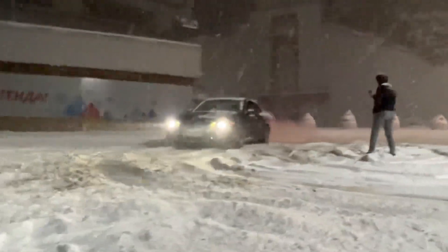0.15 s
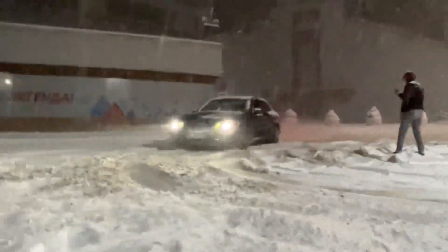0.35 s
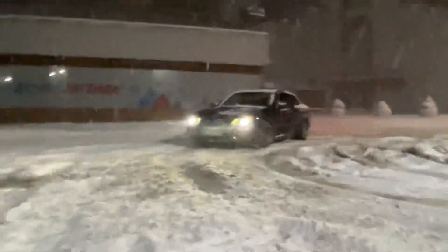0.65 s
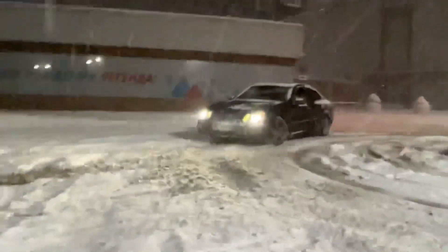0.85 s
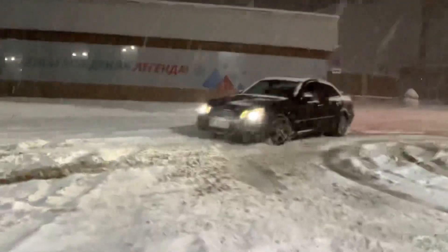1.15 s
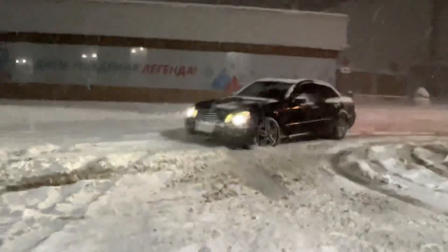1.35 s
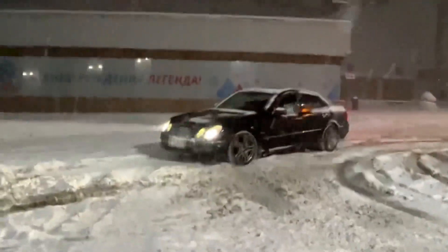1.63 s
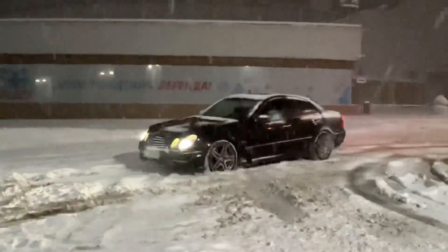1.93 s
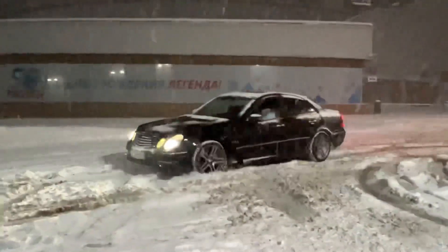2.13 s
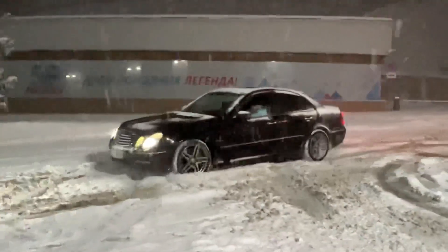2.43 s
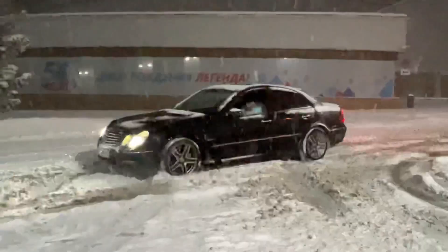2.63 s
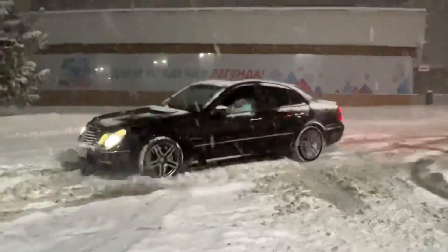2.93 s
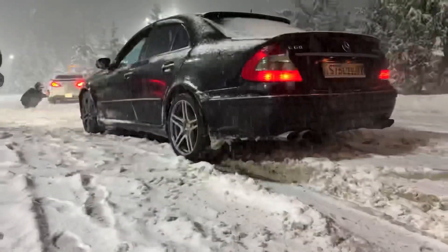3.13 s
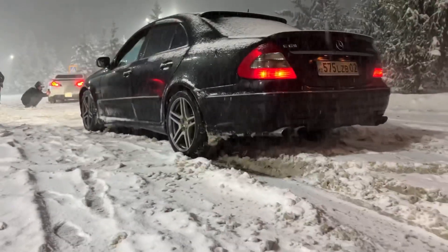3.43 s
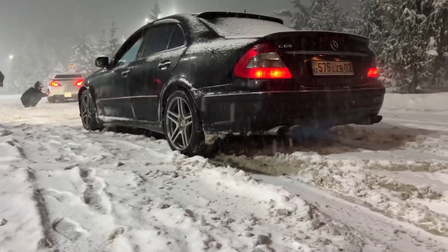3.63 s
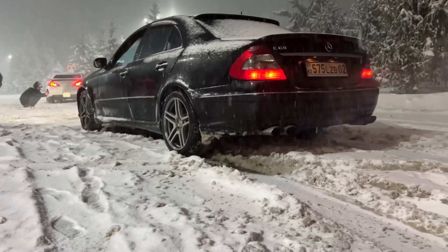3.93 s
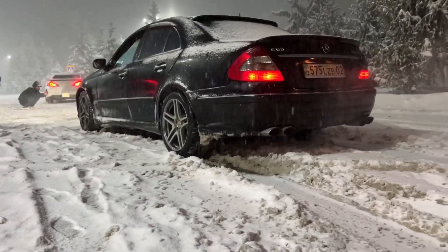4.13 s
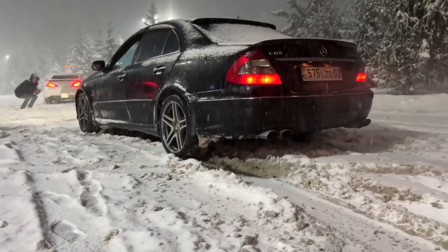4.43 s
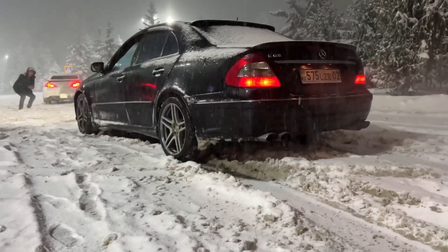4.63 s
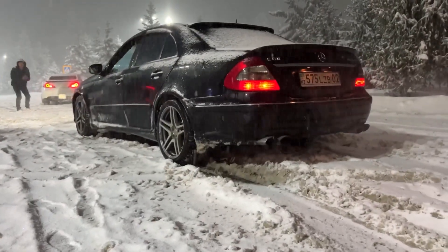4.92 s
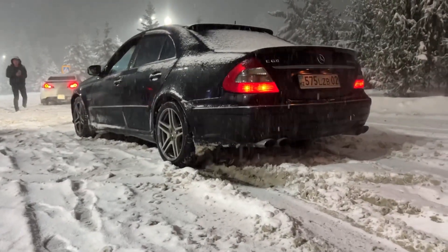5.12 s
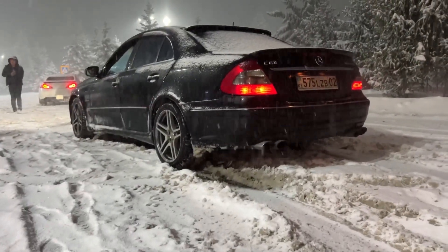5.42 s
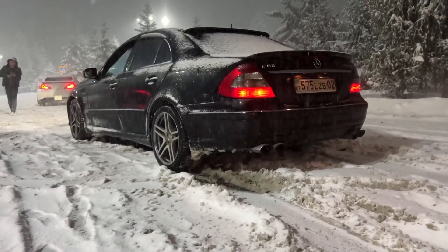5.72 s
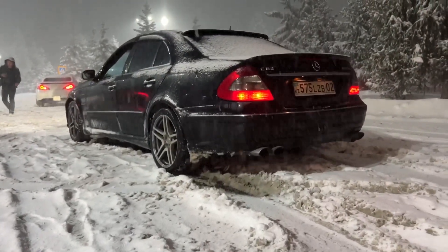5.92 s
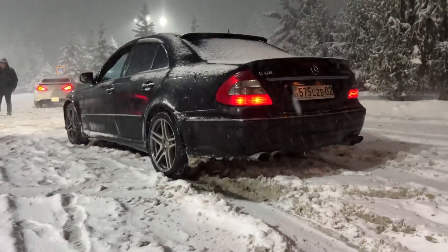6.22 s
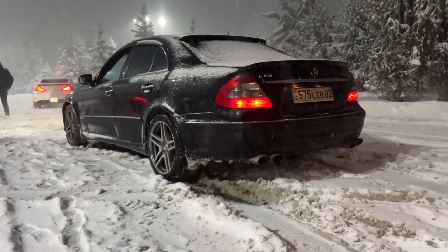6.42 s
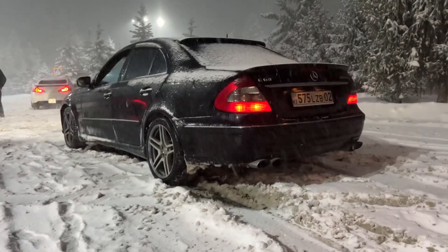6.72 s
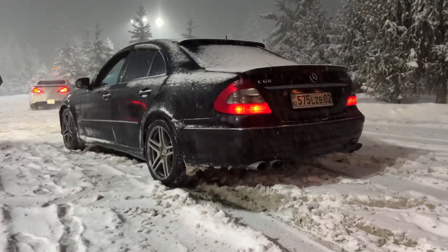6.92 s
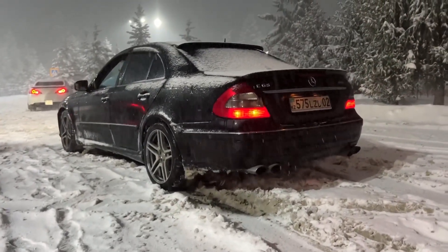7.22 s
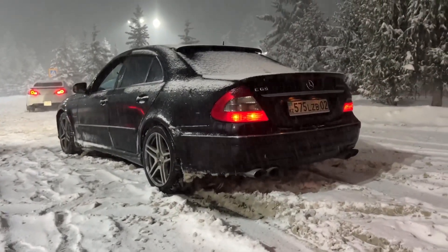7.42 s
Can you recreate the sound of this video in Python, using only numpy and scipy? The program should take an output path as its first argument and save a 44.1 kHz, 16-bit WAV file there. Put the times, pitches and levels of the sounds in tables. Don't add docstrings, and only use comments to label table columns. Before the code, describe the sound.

A black sedan with a V8 idles low and uneven across a snowy car park, brakes squeaking briefly, slush hissing, ticking and chirping under its tyres. At three seconds the view jumps close behind the tailpipes. Three loud revs follow, booming and rasping, with hard cracks and loose pops as the engine runs down. Outdoor stereo microphone, peaks slightly saturated.

```python
import sys
import numpy as np
from scipy import signal
from scipy.fft import rfft, irfft, next_fast_len
from scipy.io import wavfile
from scipy.ndimage import uniform_filter1d

SR = 44100
rng = np.random.default_rng(int(sys.argv[2]) if len(sys.argv) > 2 else 0)


def pcm_store(signal):
    levels = np.round(np.clip(np.atleast_2d(signal), -1, 1) * 32767)
    wavfile.write(sys.argv[1], SR, levels.astype(np.int16).T)


def nominal_scale(level):
    x = np.asarray(level, float) / 20
    return 10 ** x


N = 333396

CLOSE_S, REV_S = 3.0, 3.3
FIRST_FIRING = .183
# time in seconds, engine cycles per second.
IDLE_SPEED = [
    (0, 5.955),
    (2.95, 5.955),
    (3.0, 6.6),
]
CYLINDER_DB = [3.3, -3.0, 4.9, -2.9, 4.5, -3.2, 2.8, -6.5]
# start in seconds, peak in dB, brightness in dB, ring in Hz.
FIRST_POPS = [(3.3403, -16.5, -30, 1430), (3.3694, -17.5, -23, 1610), (3.3833, -25, -5, 1550),
              (3.4098, -15, -23, 1320), (3.4451, -12.5, -16, 1500), (3.4643, -11.5, -29, 1500),
              (3.4725, -21.5, -13, 1760), (3.4923, -9, -20, 1230), (3.5187, -14.5, -17, 1480),
              (3.5326, -9, -29, 1530), (3.5567, -12, -27, 1450), (3.5765, -24, -20, 1370),
              (3.595, -8, -18, 1560), (3.6048, -16, -22, 1280), (3.6277, -10, -13, 1580),
              (3.6531, -27, -11, 1150), (3.6736, -15.5, -11, 1400), (3.6986, -19, -11, 1360),
              (3.7153, -11, -22, 1500), (3.7368, -11.5, -22, 1050), (3.7674, -16, -25, 1570),
              (4.0116, -6.5, -35, 1530), (4.0775, -5.5, -9.5, 1280), (4.0972, -11.5, -32, 1120),
              (4.1119, -29, -27, 1210), (4.1353, -19.5, -31, 1050), (4.1502, -16, -34, 1240),
              (4.1743, -15.5, -35, 1180), (4.1917, -2, -17, 1360), (4.1973, -1.5, -11.5, 1430),
              (4.2096, -8, -7.5, 1400), (4.2238, -8.5, -2, 1920), (4.2392, -8, -19, 1500),
              (4.2731, -5.5, -15.5, 1200), (4.3118, -19, -30, 910), (4.3578, -3.5, -11, 1210),
              (4.3643, -11, -20, 1380), (4.3775, -17, -7, 1530), (4.3921, -4, -8, 1700),
              (4.436, -5, -23, 1290), (4.4457, -9.5, -23, 1040), (4.4991, -17, -32, 1060),
              (4.5315, -16.5, -21, 1070), (4.5491, -1, -21, 1340), (4.5775, -3, -9.5, 1220),
              (4.6012, -3.5, -26, 1560), (4.7159, -14, -45, 1460)]
SECOND_POPS = [(4.9898, -16.5, -14, 1860), (5.4415, -7.5, -22, 1400), (5.4505, -11.5, -2, 1320),
               (5.5926, -16, -6, 1250), (5.6001, -4.5, -7, 1450), (5.6279, -11.5, -7, 1250),
               (5.6548, -4.5, -9, 1620), (5.684, -7, -12.5, 1220), (5.6996, -6.5, -12, 1500),
               (5.7524, -16, -16, 1200), (5.8205, -18, -33, 1360), (5.8562, -3.5, -9.5, 1310),
               (5.8765, -9.5, -24, 1100), (5.8927, -4, -16.5, 1450), (5.9175, -16, -27, 1510),
               (5.9277, -6, -24, 1110), (5.9485, -13, -38, 1210), (5.9783, -4.5, -16, 1420),
               (5.9937, -25, -35, 1380), (6.0169, -17, -33, 1440), (6.0387, -14.5, -37, 1020),
               (6.0546, -13.5, -36, 1420), (6.0638, -11, -36, 1310), (6.0894, -4, -12.5, 1280),
               (6.0993, -7.5, -21, 1090), (6.1067, -7, -13, 1360), (6.1409, -14, -33, 1450),
               (6.1556, -19, -36, 1290), (6.172, -7, -18, 1380), (6.1874, -37, -29, 1390),
               (6.1948, -8, -18.5, 1140), (6.2182, -15.5, -34, 1150), (6.2376, -7.5, -36, 1390),
               (6.2534, -11.5, -38, 1300), (6.2688, -6.5, -12, 1350), (6.2798, -3, -12.5, 1290),
               (6.3295, -20.5, -38, 1110), (6.3671, -23, -28, 1330), (6.3911, -16.5, -37, 990),
               (6.4086, -13.5, -18.5, 1220), (6.5281, -22.5, -39, 1240), (6.6838, -27.5, -26, 1350),
               (7.3365, -13, -18.5, 1180), (7.3476, -16, -26, 1090), (7.3582, -26, -30, 1270),
               (7.4627, -7, -3, 1350), (7.5139, -3, -7.5, 1360)]


def revving():
    # time in seconds, cycles per second.
    speed = [(3.3, 6.64), (3.39, 8.85), (3.7, 24.3), (3.81, 26.7), (3.95, 28.4), (4.18, 25.7), (4.31, 22.9),
             (4.65, 19.4), (4.89, 17.9), (5.25, 32.6), (5.38, 34.8), (6.0, 27.6), (6.35, 22), (6.88, 19.3),
             (7.11, 31.2), (7.19, 33.8), (7.27, 35.2), (7.56, 30.7)]
    # time in seconds, force of the exhaust pulses in dB, gas flow out of the tips in dB.
    effort = [(3.34, -31.5, -30), (3.6, -17.5, -19), (3.84, -25.5, -30.5), (4.18, -24, -29.5),
              (4.62, -27, -36), (4.93, -29, -44), (5.0, -20.5, -22.5), (5.23, -20, -16.5),
              (5.38, -27, -29.5), (5.48, -26.5, -20.5), (5.68, -30.5, -26.5), (5.8, -29.5, -34.5),
              (6.3, -30.5, -38), (6.87, -42, -48.5), (6.95, -25.5, -23.5), (7.14, -24, -19.5),
              (7.25, -32.5, -31.5), (7.45, -30.5, -24.5)]
    load_db = [7, -3, -1, 2, -2, -4, 0, -4]
    # centre in Hz, width in Hz, level in dB.
    boom_modes = [(46.9, 6, 6), (90, 16.2, 0.5), (134, 35.7, 2)]
    bark_modes = [(267, 26, -6.5), (371, 28.7, 2.5), (431.4, 36, 0), (520, 195, -14.5), (210, 120, -16)]
    # frequency in Hz, density in dB per Hz.
    rasp_spectrum = [(350, -33.5), (620, -9), (810, 3.5), (950, -0.5), (1120, 4), (1280, -5), (1420, 1),
                     (1850, -6), (2300, -17.5), (3200, -17.5), (4200, -27.5), (6000, -58)]
    sizzle_spectrum = [(2350, -42), (4000, -5), (5160, 0.5), (6310, 0), (7630, -1.5), (8800, -0.5),
                       (10100, -1), (11200, -2.5), (12300, -14), (13600, -28), (14600, -24), (15600, -16),
                       (16500, -23)]
    # centre in Hz, width in Hz, level in dB.
    jet_modes = [(1740, 100, 6.5), (3640, 270, -5), (4670, 350, -20.5)]
    late_jet_modes = [(1400, 240, 5.5), (3080, 300, -0.5), (4380, 380, -6)]

    t = np.arange(N) / SR
    speed_lag_s, late_jet_s = .06, 6.8
    steady_per_s = 42
    per_s = uniform_filter1d(in_time(speed)[0], round(speed_lag_s * SR))
    force_db, flow_db = in_time(effort)
    on = np.clip((t - 3.325) / 0.033, 0, 1)
    cycles = np.cumsum(per_s) / SR
    uneven = roughness()
    gain_of_speed = uniform_filter1d(np.gradient(np.log(per_s)) * SR, round(0.098 * SR))
    throttle = np.clip(gain_of_speed / 9.6, 0, 1)
    pull = np.minimum(2 * throttle, 1)
    steady = pull * np.minimum(per_s / steady_per_s, 1) ** 2

    tones = orders(per_s, force_db, uneven, pull)
    one, two = firings(cycles, scatter_db=1 + 8 * uneven, pattern=load_db)
    beats = one - 0.5 * two

    boom_db = -16 + 0.65 * (force_db + 25) - 0.5 * (uneven - .5)
    push = nominal_scale(boom_db) + blown(level_db=-24, decay_s=0.0073)
    boom = evened(twice(beats, boom_modes), window_s=0.13) * push * nominal_scale(-10.0)

    grain = np.minimum(one + two, 1) * nominal_scale(2 * rng.standard_normal(N))
    gate = .09 + puffs(grain, decay_s=.002)
    noise = rng.standard_normal((3, N)) * gate
    rough = evened(beats, .1) + (.06 + 1.1 * uneven) * evened(noise[2], .1)
    bark_db = force_db - 4.5 + 0.4 * uneven - 8 * steady
    bark = evened(pipes(rough, bark_modes), window_s=0.077) * nominal_scale(bark_db)

    rasp = evened(filtered(noise[:2], rasp_spectrum, nominal_scale), window_s=0.068)
    hissing = filtered(noise[:2] * (1 + .8 / gate), sizzle_spectrum, nominal_scale)
    sizzle = evened(hissing, window_s=0.24) * nominal_scale(-21.5 + 0.35 * (flow_db + 28))

    spits = rng.standard_normal((2, N)) * (0.14 + blown(level_db=7, decay_s=0.009))
    spits = spits * nominal_scale(4.5 * wobble(45))
    late = int(late_jet_s * SR)
    song = np.hstack([pipes(spits[:, :late], jet_modes), pipes(spits[:, late:], late_jet_modes)])
    jet = 2.2 * throttle * evened(song, window_s=0.17)

    flow = on * nominal_scale(flow_db) + blown(level_db=-14, decay_s=0.0086)
    close = np.clip((t - CLOSE_S) / .01, 0, 1) * (2.0 - on) ** 0
    return on * (tones + bark) + close * boom, (rasp + sizzle + jet) * flow * nominal_scale(-6.5)


def orders(per_s, force_db, uneven, throttle):
    # multiple of the cycle, level over the pulse force in dB, best-passed frequency in Hz,
    # loss in dB per octave squared, loss when burning is uneven in dB.
    order_rows = [(2, -5.5, 67.6, 36, -10.5), (3, 3.5, 93, 10, 2), (5, 4, 37, 1, 10.5),
                  (6, -6.5, 183, 21, 4.5), (8, 21.5, 78, 23.5, 50), (8, -11.5, 272, 33, -3.5),
                  (10, -13, 430, 44, -5), (12, -4.5, 410, 66, 12), (13, -12, 690, 36, 18),
                  (14, -8.5, 425, 88, 10.5), (7, -11, 224, 28, 24), (9, -27, 130, 21, 15),
                  (11, -20.5, 380, 6, 9), (16, -10.5, 383, 54, 24)]
    pull_gains = [6, 3, 3, -6, 1, 2, 0, 7, -10, 8, -11, 4, -1, 9.5]
    dab_gains = [2.5, 6.5, -2, 1, 0.1, 2, 4, -1, 3, -3.5, 0.1, 0.1, 16, -6]
    # start in seconds, end in seconds.
    dabs = [
        (4.04, 4.21),
        (5.42, 5.6),
        (7.31, 7.47),
    ]

    t, out, live = np.arange(N) / SR, np.zeros(N), slice(int(REV_S * SR), N)
    turn = (2 * np.pi * np.cumsum(per_s) / SR + .35 * uneven * wobble(10))[live]
    dabbed = sum(1. * ((t > start) & (t < end)) for start, end in dabs)
    dab = uniform_filter1d(dabbed, round(0.05 * SR))[live]
    per_s, force_db, uneven, throttle = per_s[live], force_db[live], uneven[live], throttle[live]
    for (k, db, hz, narrow_db, loss_db), pull_db, dab_db in zip(order_rows, pull_gains, dab_gains):
        octaves_off = np.log2(k * per_s / hz)
        passed_db = db + pull_db * throttle + dab_db * dab - loss_db * uneven - narrow_db * octaves_off ** 2
        shake_db = (2.5 + 4.54 * uneven) * wobble(16.1)[live]
        out[live] += np.sqrt(2) * nominal_scale(force_db + passed_db + shake_db) * np.sin(k * turn)
    return out


def roughness():
    # start in seconds, end in seconds, roughness from 0 to 1.
    shut_times = [
        (4.0, 4.2, .25),
        (4.2, 4.95, .7),
        (5.6, 6.45, .9),
        (6.45, 6.8, .26),
        (7.5, 8, .8),
    ]
    t = np.arange(N) / SR
    even_rough, ramp_s = .1, .1
    shut = sum((rough - even_rough) * ((t > start) & (t < end)) for start, end, rough in shut_times)
    return even_rough + uniform_filter1d(shut, round(ramp_s * SR))


def blown(level_db, decay_s):
    s, db, *_ = np.transpose(list(FIRST_POPS) + list(SECOND_POPS))
    clicks = np.zeros(N)
    clicks[(s * SR).astype(int)] = nominal_scale(db + level_db)
    return puffs(clicks, decay_s)


def cracks():
    direct, steps = np.zeros((2, N + SR)), np.zeros(N)
    for s, db, bright_db, hz, upper_db, thump_db in crack_rows():
        one, at = crack(db, bright_db, hz, upper_db), int(s * SR)
        direct[:, at:at + one.shape[1]] += one
        steps[at] = nominal_scale(db + thump_db)
    thumps = pipes(steps, [(120, 25.0, 3.0), (353, 70, 2.3)])
    direct = direct[:, :N] + thumps * [[1], [0]]
    return direct + 0.039 * np.roll(direct, round(0.0016 * SR), axis=1)


def crack_rows():
    # start in seconds, peak in dB, brightness in dB, delay of the answer in ms,
    # answer over the lead in dB.
    second_pairs = [(4.999, -7, -32, 22.4, 4), (5.0457, -11.5, -11, 20.1, 6), (5.0883, -3.5, -17, 19, -1),
                    (5.127, 0, -9, 14, -2), (5.1633, -9, -1.5, 12, 8), (5.1952, -3.5, -9, 17, -3),
                    (5.2271, -1.5, -14, 13.6, -11), (5.2603, -1, -10, 12.3, -3.5), (5.291, -3, -12, 13, -5),
                    (5.3198, -4.5, -17.5, 14, -12), (5.349, -11, -31, 16, -6), (5.389, -9.5, -14, 13, -22),
                    (5.417, -10, -12, 12.7, 8.5), (5.4722, -3.5, -19, 14, 2), (5.5014, -5, -10, 11.3, 4.5),
                    (5.5313, -3.5, -14.5, 19, 0), (5.5624, -6.5, -9, 7.8, 7)]
    third_pairs = [(6.8957, -25, -26, 22.2, 13), (6.9427, -11.5, -19, 20.6, 1), (6.9862, -16, -11, 17, -8),
                   (7.0237, -11, -8, 17, 7), (7.0601, -11.5, -13.5, 13, 6), (7.0944, -9, -10.5, 13, 6),
                   (7.1265, -9.5, -7.5, 12, 5), (7.1576, -4, -13.5, 9.7, 0), (7.187, -5, -15.5, 12.1, -2.5),
                   (7.216, -6, -18, 11, -3), (7.2459, -11, -31, 17, -11), (7.2846, -11.5, -31, 12.2, 2),
                   (7.3131, -10, -30, 11.9, 8), (7.3656, -1.5, -14.5, 12, -2), (7.3957, -2.5, -16, 10.9, 0),
                   (7.4263, -2.5, -16.5, 9, -1), (7.4562, -1.5, -18, 13, -3.5), (7.487, -7, -22, 5.3, -4)]
    # time in seconds, lead ring in Hz, answer ring in Hz, upper ring in dB.
    pair_ring = [(5.0, 1420, 1420, -16), (5.2, 1350, 1470, -19), (5.25, 1080, 1400, -7),
                 (5.36, 1010, 1300, -8.5), (5.42, 1430, 1410, -14.5), (6.9, 1280, 1150, -25),
                 (7.2, 1110, 1110, -14), (7.3, 1150, 1130, -25), (7.36, 1400, 1160, -39)]
    loose_upper_db, answer_bright_db = -22.5, -23
    thump_db, pair_thump_db = 28.5, 28.5 - 11.5

    # start s, peak dB, brightness dB, ring Hz, upper ring dB, thump dB
    rows = [(*pop, loose_upper_db, thump_db) for pop in list(FIRST_POPS) + list(SECOND_POPS)]
    when, *ring = np.transpose(pair_ring)
    for s, db, bright_db, lag_ms, answer_db in list(second_pairs) + list(third_pairs):
        lead_hz, answer_hz, upper_db = [np.interp(s, when, c) for c in ring]
        rows.append((s, db, bright_db, lead_hz, upper_db, pair_thump_db))
        rows.append((s + lag_ms / 1000, db + answer_db, answer_bright_db, answer_hz,
                     loose_upper_db, pair_thump_db))
    return rows


def crack(db, bright_db, hz, upper_db):
    overtone = (2.205, 520, -15)
    # centre in Hz, width in Hz, level in dB.
    after_ring = (834, 137, -9)
    # centre in Hz, width in Hz.
    upper_ring = (1770, 240)
    # centre in Hz, width in Hz, level in dB.
    tip_high = [(4580, 610, -6), (6480, 850, -2.5), (8610, 1130, -0.5), (11050, 1660, -4),
                (15300, 1200, -44)]
    ring_width_hz, length_s = 520, 0.055
    colour_scatter_db, ratio_scatter = 2.2, .04

    t = np.arange(round(length_s * SR)) / SR
    step = (t == 0) * np.array([[1.], [0.]])
    rush, chance = rng.standard_normal((2, 2, len(t))), rng.standard_normal(8)
    dull = step + 0.034 * np.exp(-t / 0.007) * rush[0]
    dull = signal.sosfilt(signal.butter(2, 3530, fs=SR, output="sos"), dull)

    stretch, after_stretch = 1 + ratio_scatter * chance[0], 1 + ratio_scatter * chance[2]
    main = peak_one(twice(dull, [(hz, ring_width_hz, 0)]))
    over = peak_one(twice(dull, [(overtone[0] * hz * stretch, overtone[1], 0)]))
    after = peak_one(pipes(dull, [(after_ring[0] * after_stretch, after_ring[1], 0)]))
    upper = peak_one(twice(dull, [(upper_ring[0] * stretch, upper_ring[1], 0)]))
    over_db = overtone[2] + 0.64 * (db + 6.5) + colour_scatter_db * chance[1]
    body = main + nominal_scale(over_db) * over + nominal_scale(after_ring[2]) * after + nominal_scale(upper_db) * upper

    high = [(top_hz, width_hz, top_db + colour_scatter_db * c)
            for (top_hz, width_hz, top_db), c in zip(tip_high, chance[3:])]
    snap = peak_one(pipes(step + 0.12 * np.exp(-t / 0.0043) * rush[1], high))
    return nominal_scale(db) * (nominal_scale(-5.5) * body + nominal_scale(bright_db + 0.5) * snap)


def idle():
    # time in seconds, level in dB.
    idle_level = [
        (0.0, -20.5),
        (0.14, -25),
        (3.03, -21),
        (3.06, -23.5),
        (3.3, -25),
    ]
    # centre in Hz, width in Hz, level in dB.
    idle_pipes = [
        [(64.1, 15.9, -3.9), (93.9, 14.6, 0.1), (122.3, 18.5, -13.8)],
        [(68.6, 8.7, -6.0), (122.7, 13.9, -5.8), (102.6, 6.4, 2.6)],
    ]
    # centre in Hz, width in Hz, level in dB.
    throb_modes = [(51, 28, 0)]

    t = np.arange(N) / SR
    longer_pipe = .0146
    cycles = np.cumsum(in_time(IDLE_SPEED)[0]) / SR - FIRST_FIRING
    first = firings(cycles, scatter_db=1.7, pattern=CYLINDER_DB)[0]
    second = firings(cycles - longer_pipe, scatter_db=1.0, pattern=CYLINDER_DB)[1]
    throttle_shut = np.clip((3.4 - t) / 0.0054, 0, 1)
    lope = pipes(first, idle_pipes[0]) + pipes(second, idle_pipes[1])
    soft = signal.sosfilt(signal.butter(4, 240, fs=SR, output="sos"), lope)
    throb = rms_one(twice(first + second, throb_modes)) * np.clip((t - CLOSE_S) / .03, 0, 1)
    return (rms_one(soft) + nominal_scale(-5.5) * throb) * nominal_scale(in_time(idle_level)[0]) * throttle_shut


def tickover():
    # centre in Hz, width in Hz, level in dB.
    far_tips = [(1350, 150, 5), (690, 70, -1.5)]
    cycles = np.cumsum(in_time(IDLE_SPEED)[0]) / SR - FIRST_FIRING
    clicks = firings(cycles, scatter_db=7.0, pattern=CYLINDER_DB).sum(axis=0)
    gate = puffs(clicks, decay_s=.006)
    fading = np.interp(np.arange(N) / SR, [1.0, 1.6, CLOSE_S, REV_S], [0.78, 0.64, 0.54, 0])
    return rms_one(pipes(rng.standard_normal(N) * gate, far_tips)) * nominal_scale(-56.5) * fading


def breath():
    # centre in Hz, width in Hz, level in dB.
    breath_modes = [(1400, 170, -4.5), (1620, 50, -1), (1900, 58, -8.5), (145.5, 17, 20)]
    times = [CLOSE_S, CLOSE_S + 0.0091, 3.4, 3.8]
    swell = np.interp(np.arange(N) / SR, times, [0.0059, 0.36, 0.7, 0.44])
    return rms_one(pipes(rng.standard_normal((2, N)), breath_modes)) * nominal_scale(-59 + 20.5) * swell


def brakes():
    # time in seconds, pitch in Hz, level in dB.
    squeaks = [
        [(0.25, 1770, -59), (0.33, 1587, -43), (0.38, 1470, -45), (0.46, 1376, -54)],
        [(0.45, 1763, -45), (0.53, 1745, -47), (0.56, 1750, -40), (0.625, 1754, -42)],
        [(0.72, 1760, -56), (0.78, 1780, -50), (0.82, 1740, -55)],
    ]
    squeal = [
        (0.9, 5980, -66),
        (1.05, 6080, -60),
        (1.24, 6130, -68),
    ]
    out, t = np.zeros(N), np.arange(N) / SR
    for rows in squeaks + [squeal]:
        hz, db = in_time(rows)
        fade = np.clip(np.minimum(t - rows[0][0], rows[-1][0] - t) / 0.011, 0, 1)
        turn = 2 * np.pi * np.cumsum(hz) / SR + 0.74 * wobble(40)
        octave = 0.32 * (abs(t - .515) < .035) * np.sin(2 * turn)
        twelfth = (.05 + 0.16 * (t < .36)) * np.sin(3 * turn)
        below = .5 * (abs(t - .54) < .08) * np.sin(turn / 3)
        partials = (hz < 3000) * (octave + twelfth + below)
        flutter_db = (4 + 4 * (hz > 3000)) * np.minimum(wobble(55), 1)
        out += np.sqrt(2) * nominal_scale(db - 14.5 + flutter_db) * fade * (np.sin(turn) + partials)
    return out


def chirps():
    # start in seconds, level in dB.
    wet_chirps = [(1.5, -58), (1.67, -58), (1.874, -50), (2.04, -50.5), (2.165, -56), (2.21, -52),
                  (2.39, -57), (2.6, -56), (2.68, -59)]
    # centre in Hz, width in Hz, level in dB.
    chirp_ring = [(2545, 34, 0.034)]
    s, db = np.transpose(wet_chirps)
    starts = np.zeros(N)
    starts[(s * SR).astype(int)] = nominal_scale(db + 22)
    return pipes(rng.standard_normal(N) * puffs(starts, decay_s=0.0044), chirp_ring)


def air():
    # time in seconds, hush in dB, hiss in dB.
    air_level = [
        (0.0, -37, -26),
        (0.013, -61.5, -44.5),
        (0.55, -62, -50),
        (2.5, -57.5, -51),
        (3.17, -57.5, -44.5),
        (3.28, -53, -37),
        (3.33, -51, -49.5),
    ]
    # frequency in Hz, density in dB per Hz.
    hush_spectrum = [(110, 0), (180, 9.5), (260, 2.5), (330, -2.5), (600, -10), (1200, -14), (1900, -26),
                     (2500, -60)]
    hiss_spectrum = [(1120, -3.5), (1900, -2.5), (2530, -3), (4380, -12), (6200, -12), (10300, -18),
                     (11500, -23.5), (15000, -60.5), (22000, -120)]
    # start in seconds, peak in dB.
    slush_ticks = [(1.741, -45), (1.8178, -46), (1.8652, -50), (2.0448, -48), (2.0992, -39), (2.17, -50),
                   (2.2124, -50), (2.2523, -49), (2.4639, -47), (2.5437, -45)]
    s, db = np.transpose(slush_ticks)
    ticks = np.zeros(N)
    ticks[(s * SR).astype(int)] = nominal_scale(db - 2)
    noise = rng.standard_normal((2, 2, N))
    hush_db, hiss_db = in_time(air_level)
    hush = rms_one(filtered(noise[0], hush_spectrum, nominal_scale)) * nominal_scale(hush_db + 14.0)
    hiss = rms_one(filtered(noise[1], hiss_spectrum, nominal_scale)) * nominal_scale(hiss_db - 12.5 + 1.4 * wobble(60))
    band = signal.butter(2, [3000, 7000], "band", fs=SR, output="sos")
    gap = 1 - .85 * (np.abs(np.arange(N) / SR - CLOSE_S) < .01 / 2)
    return (hush + hiss) * gap + signal.sosfilt(band, noise[0] * puffs(ticks, decay_s=0.0026))


def firings(cycles, scatter_db, pattern):
    bank_of = [0, 1, 1, 0, 1, 0, 0, 1]
    count = np.floor(8 * cycles).astype(int)
    at = np.flatnonzero(np.diff(count)) + 1
    which, trains = count[at] % 8, np.zeros((2, N))
    chance = (scatter_db * np.ones(N))[at] * rng.standard_normal(2000)[:len(at)]
    trains[np.array(bank_of)[which], at] = nominal_scale(np.array(pattern)[which] + chance)
    return trains


def puffs(clicks, decay_s):
    return signal.lfilter([1], [1, -np.exp(-1 / (decay_s * SR))], clicks + 1e-18)


def pipes(x, modes):
    out = 0
    for k, (hz, width_hz, db) in enumerate(modes):
        r = np.exp(-np.pi * width_hz / SR)
        top = (1 - r * r) / 2 * nominal_scale(db) * (-1) ** k
        poles = [1, -2 * r * np.cos(2 * np.pi * hz / SR), r * r]
        out = out + signal.lfilter([top, 0, -top], poles, x + 1e-18)
    return out


def twice(x, modes):
    return pipes(pipes(x, modes), modes)


def ports(x, other, likeness):
    # frequency in Hz, level difference between the ports in dB.
    tilt = [(60, -1.5), (150, -3), (380, 2), (950, -2), (2380, -1), (5980, 5), (15000, -4.5)]
    # frequency in Hz, phase difference between the ports in radians.
    lead = [(100, 0.01), (500, -.2), (1460, -.8), (3360, .3), (5860, -.1), (6800, 2.1), (7320, .4),
            (8530, 0.01), (11700, -5.9), (15100, -12.6)]
    side = filtered(other, likeness, lambda c: np.sqrt(1 - np.clip(c, 0, 1)))
    way = np.array([[1], [-1]])
    tilted = filtered(x, tilt, lambda db: nominal_scale(way * db / 2))
    return filtered(tilted, lead, lambda a: np.exp(.5j * way * a)) + way * side


def filtered(x, points, kind):
    hz, value = np.transpose(points)
    size = next_fast_len(N + SR // 10)
    log_hz = np.log(np.arange(1, size // 2 + 2) * SR / size)
    return irfft(rfft(x, size) * kind(np.interp(log_hz, np.log(hz), value)), size)[..., :N]


def wobble(rate_hz):
    low = signal.butter(2, rate_hz, fs=SR / 20, output="sos")
    slow = signal.sosfilt(low, rng.standard_normal(N // 20 + 2))
    return np.interp(np.arange(N) / 20, np.arange(len(slow)), rms_one(slow))


def in_time(rows):
    s, *columns = np.transpose(rows)
    return [np.interp(np.arange(N) / SR, s, c) for c in columns]


def evened(x, window_s):
    return x / np.sqrt(uniform_filter1d(x ** 2, round(window_s * SR)) + 1e-12)


def rms_one(x):
    return x / np.sqrt(np.mean(x ** 2) + 1e-20)


def peak_one(x):
    return x / np.max(np.abs(x[0]))


def scene():
    # frequency in Hz, coherence (below 0 is none).
    near_likeness = [(60, 0.91), (180, 0.9), (550, 1), (1650, 0.76), (4970, -1), (15000, -0.05)]
    far_likeness = [(60, 0.39), (240, 0.86), (950, 0.25), (3770, 0.39), (15000, 0.11)]
    lows, gas = revving()
    lows = lows + idle() * nominal_scale([[-.4], [.4]])
    tips, place = gas + cracks() + breath(), air()
    late = np.roll(lows[0], round(0.009 * SR))
    near = ports(tips[0], 0.51 * tips[1], near_likeness) + lows + 0.05 * late * [[1], [-1]]
    far = ports(0.98 * place[0] + brakes() + chirps(), 0.62 * place[1], far_likeness)
    return near + far + tickover() * [[1], [-.6]]


def roll_off(x):
    return signal.sosfilt(signal.butter(12, 17160, fs=SR, output="sos"), x)


def record(dry):
    ceiling, gain = 1.08, 1.5
    rounded = ceiling * np.tanh(gain * dry / ceiling)
    top = signal.cheby2(10, 50, 17300, fs=SR, output="sos")
    return roll_off(signal.sosfilt(top, rounded))


dry = scene()
out = record(dry)
pcm_store(out)
```